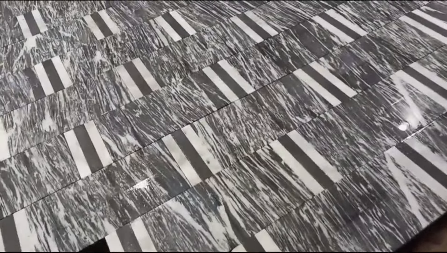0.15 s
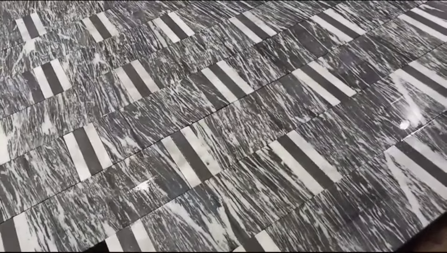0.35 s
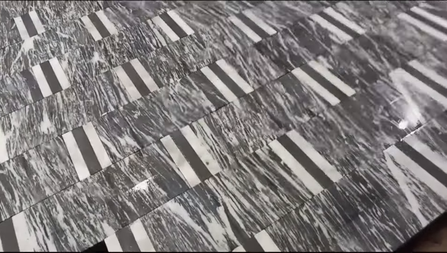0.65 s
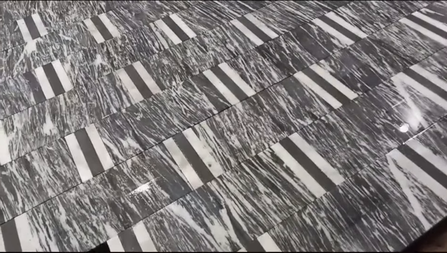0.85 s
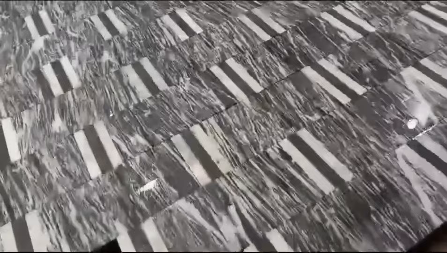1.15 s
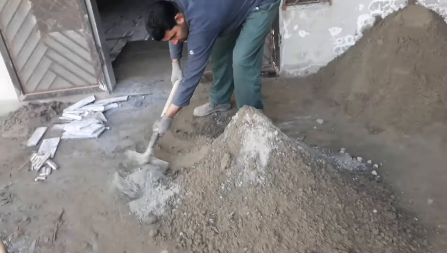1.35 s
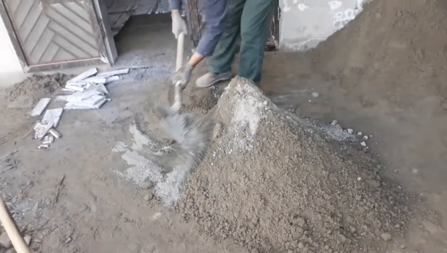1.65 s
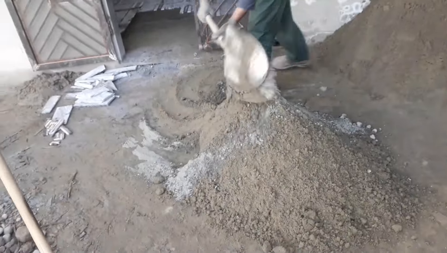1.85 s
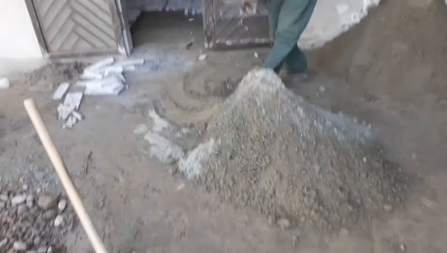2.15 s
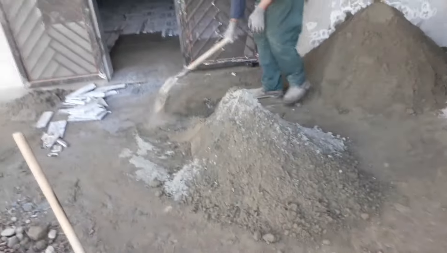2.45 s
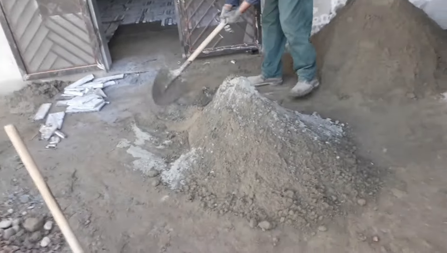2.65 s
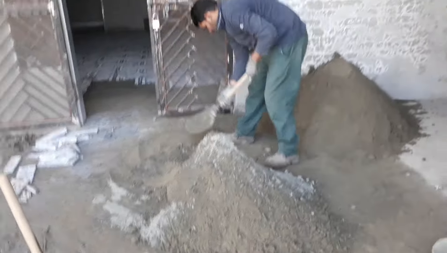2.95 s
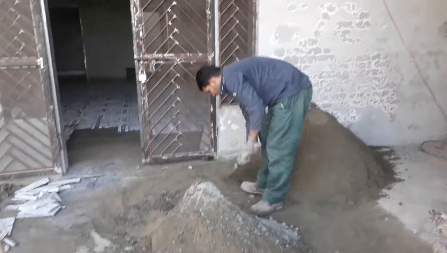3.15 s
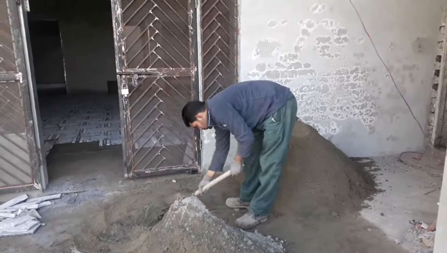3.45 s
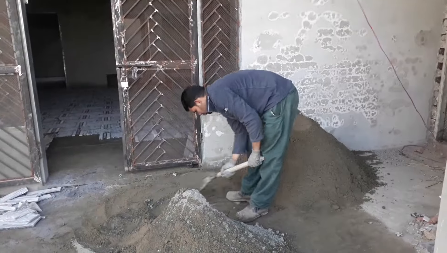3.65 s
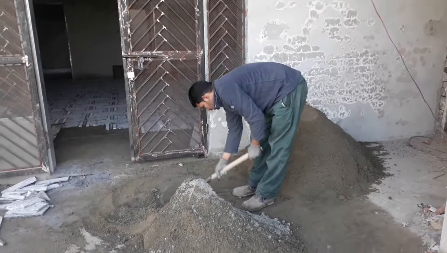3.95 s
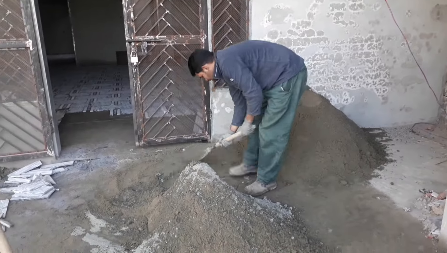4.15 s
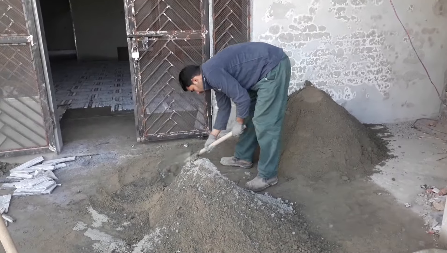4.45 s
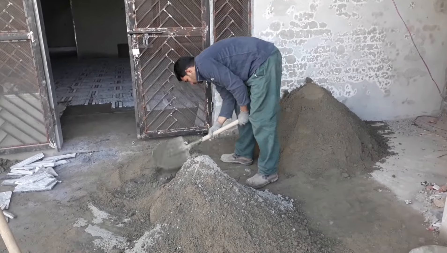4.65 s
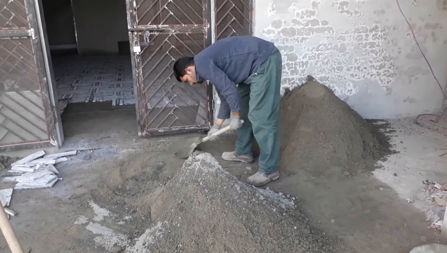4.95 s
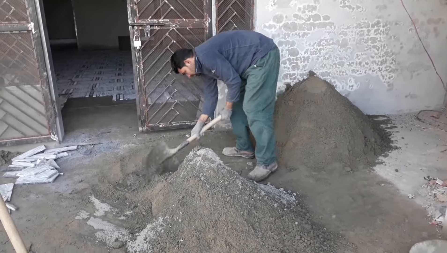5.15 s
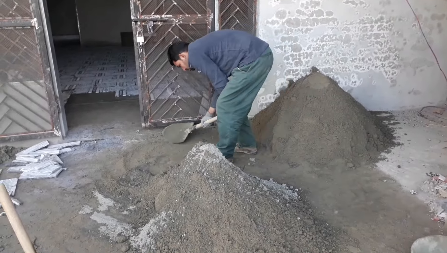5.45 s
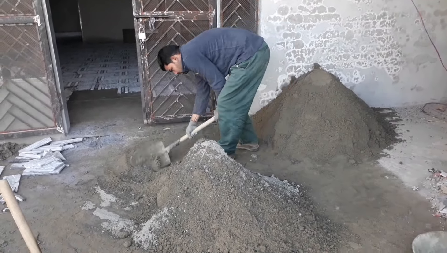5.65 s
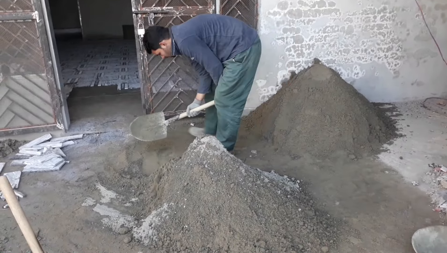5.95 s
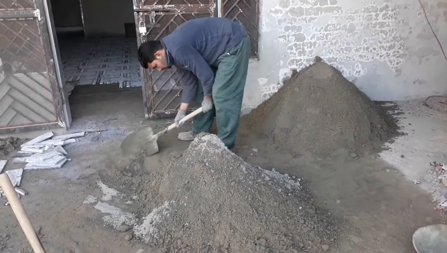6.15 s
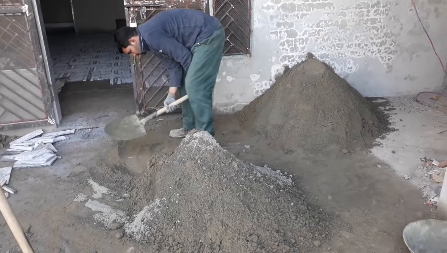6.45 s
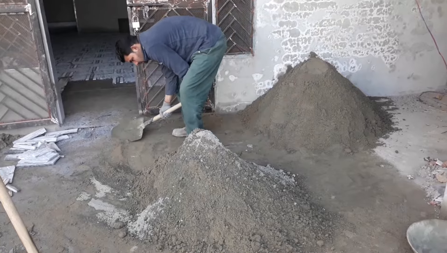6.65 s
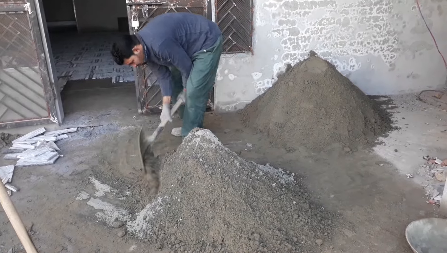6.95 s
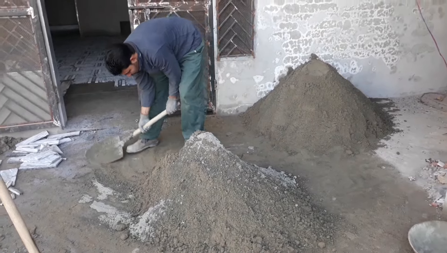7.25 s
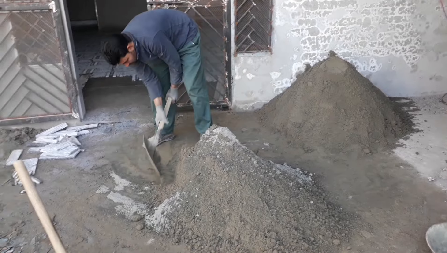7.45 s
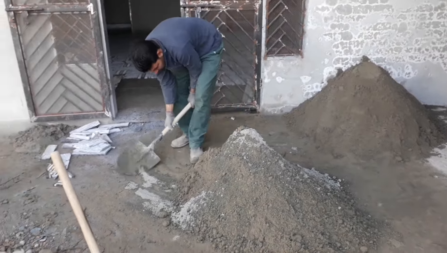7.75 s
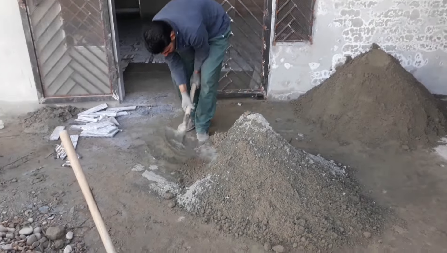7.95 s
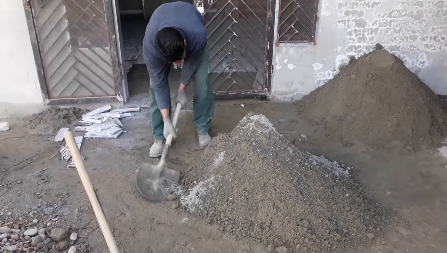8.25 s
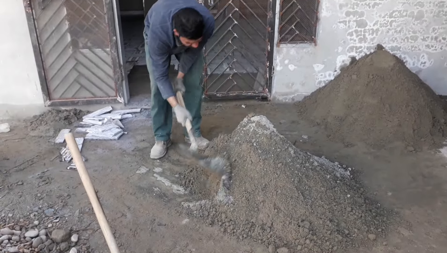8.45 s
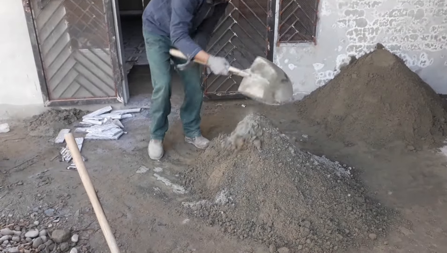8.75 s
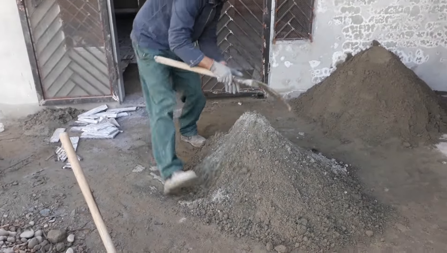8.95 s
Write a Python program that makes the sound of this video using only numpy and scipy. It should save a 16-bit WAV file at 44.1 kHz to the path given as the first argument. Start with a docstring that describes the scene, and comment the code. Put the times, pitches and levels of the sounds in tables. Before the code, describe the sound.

Steel shovel mixing sand and cement on a hard floor between brick walls, heard in mono from a short distance. Quiet room air switches abruptly to faint yard air. A muffled scoop, a loud hollow bang with a weaker follow-up and a thin distant whistle precede steady rasping pushes, with metallic clanks where the edge catches stones. It ends in small rustles and a dull bump.

```python
"""A hushed room indoors, then the scene changes to a concrete yard between brick walls, picked up as one mono
channel. A steel shovel turns sand and cement: one soft stroke, a sharp hollow knock and a duller one, then ten
strokes. Each stroke is a fluttering stream of grain clicks that rings the blade as it lands, grinds and lifts.
Bands of clicks make loose sand hiss and cloth or sand rustle, fading modes ring in the knocks, decaying noise
makes the walls ring on, and a thin far whistle, a gliding sine, sounds once over coloured noise for the air."""
import sys
import numpy as np
from scipy import signal
from scipy.fft import rfft, irfft
from scipy.io import wavfile

SR = 44100
rng = np.random.default_rng(int(sys.argv[2]) if len(sys.argv) > 2 else 0)


def put_to_file(sound):
    """Save the sound as 16-bit audio at rate SR, in the file named by the first command-line argument."""
    columns = np.atleast_2d(sound).T  # one column per channel
    safe = np.clip(columns, -1, 1)
    whole_steps = np.round(safe * 32767)
    wavfile.write(sys.argv[1], SR, whole_steps.astype(np.int16))


N = 400869
TIME = np.arange(N) / SR

# Levels of shovel, knocks, slides, scuffs and ticks stand ahead of this common trim.
WORK_TRIM_DB = -1.5
# Spectra give only a shape: they are scaled to unit power before a level is set.

# Shovel strokes, from landing through skim, swell to the hardest push and slackening to the lift:
# [start_s, skim_s, swell_s, slack_s, hardest_grinding_db, swell_db, load_body_db and sharp_grit_db re grinding
# at the hardest push, landing_thud_db, landing_clash_db]
SHOVEL_STROKES = [ (1.230, 0.0023, .200, 0.037, -33, 5, -4, -9, -66, -42),
                  (3.209, 0.05, 0.15, 0.046, -27, 8, -10, -2.5, -27, -31),
                  (3.74, 0.049, 0.057, 0.12, -25, 4, -10.5, -2, -29.5, -26.5),
                  (4.251, 0.041, 0.16, 0.098, -26, 7, -8.5, -4.5, -33.5, -49),
                  (4.863, 0.015, 0.073, 0.15, -25, 8, -9, -3.5, -62, -32.5),
                  (5.421, 0.0078, 0.23, 0.043, -24.5, 8, -5, -4, -52, -17),
                  (6.058, 0.02, .170, 0.038, -27.5, 6, -2.5, -3.5, -52, -33),
                  (6.602, 0.016, 0.22, 0.033, -26, 9.5, -3.5, -4, -32, -36),
                  (7.224, .047, 0.12, .026, -29, 4, -8, -4.5, -40, -34),
                  (7.696, 0.042, 0.082, 0.029, -24.5, 13, -6, -4, -28, -51),
                  (8.105, 0.049, 0.084, 0.059, -26.5, 6, -8, -4, -44, -34), ]
# Edge catching on a stone in mid-stroke: [start_s, thud_db, clash_db]
STONE_HITS = [(1.355, -29, -30), (1.447, -54, -28), (3.397, -39, -30), (3.845, -41, -24), (3.908, -34, -18),
              (4.452, -50, -23), (4.516, -55, -18.5), (4.883, -38, -22.5), (5.635, -38, -22),
              (6.186, -25.5, -15.5), (7.397, -36, -20.5), (8.124, -58, -40), (8.255, -48, -18)]
# Spectrum of steel on grit: [frequency_hz, level_db per Hz]
GRIT_SPECTRUM = [(53, -46), (90, -28), (282, -16.5), (562, -16.5), (682, -11.5), (1220, -13), (1650, -3.5),
                 (1840, -4.5), (2430, -1.5), (2830, -4), (4540, -7.5), (6980, -9), (8120, -19.5),
                 (12000, -23), (15500, -40)]
# Blade resonances, nominal until the sand shifts and damps them: [pitch_hz, width_hz, lift_db]
BLADE_RESONANCES = [(682, 24, 7), (843, 48, 6), (968, 31, 4), (1307, 23, 4.5), (1674, 9.6, 9.5),
                    (2089, 59, 7.5), (2444, 88, 6), (3006, 67, 4), (3195, 74, 3), (3970, 220, 3),
                    (5860, 110, 5), (7040, 990, 7.5)]
# Spectrum of the dull landing: [frequency_hz, level_db per Hz]
THUD_SPECTRUM = [(60, -33), (130, -5.5), (300, -3), (480, -6), (720, -1), (1100, -9.5), (1700, -39),
                 (4000, -37)]
SKIM_DB = -9.5   # the edge skims the floor before it bites, re the bite
BITE_S = 0.0081   # time it takes to dig in
EASE_DB = -5   # level at the lift, re the hardest push
LIFT_DB_PER_S = -240   # grinding dies as the blade leaves the floor
FILL_DB_PER_S = 20   # the low body grows as sand piles on the blade
DULL_DB_PER_S = -8.5   # and the sharp grit is smothered
FLUTTER_DB, FLUTTERS_PER_S = 0.82, 44.9   # random level flutter, in dB and in draws per second
THUD_FADE_S, CLASH_FADE_S = 0.097, 0.031   # to 60 dB down

# Hollow knocks: [start_s, body_db, crack_db, rise_s, contact_fade_s, share of the full ring time]
HOLLOW_KNOCKS = [(2.3328, -15.5, -14.5, 0.0018, 0.084, 0.81), (2.529, -26, -27, 0.0093, 0.34, 0.72)]
# Hollow modes the knocks ring with: [pitch_hz, level_db re body, full_t60_s]
HOLLOW_MODES = [(108.5, -23, 0.51), (149.4, -6, 0.25), (191, -6.5, 0.17), (221.3, -12.5, 0.49),
                (285.5, -9.5, 0.15), (323, -11, 0.24), (480, -16, 0.094), (567.5, -1, 0.19),
                (596, -3, 0.16), (640, -2.5, 0.2), (757.5, -1.5, 0.084), (922, -26, 0.088),
                (1135, -15, 0.31), (1440, -16, 0.12), (1504, -10, 0.12), (1620, -18, 0.087)]
# Spectrum of the crack of contact: [frequency_hz, level_db per Hz]
CRACK_SPECTRUM = [(50, -21), (130, 2), (400, 2), (600, 7.5), (900, 2), (1150, -4), (1600, 1.5),
                  (1900, -6.5), (2400, 1.5), (3200, -6.5), (4000, -6.5), (4600, -11), (7000, -6.5),
                  (8500, -20), (11500, -24), (15000, -41)]
# Bright flash of the first knock, heard only directly: [pitch_hz, level_db, t60_s]
FLASH_MODES = [(2300, -10, 0.018), (2480, -14, 0.014), (3963, -20, 0.023), (4740, -28, 0.044),
               (7000, -37, .03)]

# Loose sand sliding off the blade or down the pile: [centre_s, half_length_s, level_db]
SAND_SLIDES = [(1.72, 0.26, -55.5), (2.63, 0.069, -45), (2.87, 0.21, -46), (3.02, 0.062, -33.5),
               (8.04, 0.075, -53)]
# Spectrum of the slides: [frequency_hz, level_db per Hz]
SLIDE_SPECTRUM = [(100, -35), (350, -6), (900, -19), (2000, -6.5), (2800, -8), (3550, 1), (4900, -11),
                  (6200, -5), (7150, 1.5), (8600, -20), (11000, -19), (15500, -26)]
# Short bright rustles and scuffs, of cloth or sand: [centre_s, half_length_s, level_db]
RUSTLES_AND_SCUFFS = [(.55, 0.037, -84), (1.136, .008, -66), (2.208, 0.031, -51.5), (6.015, .03, -55),
                      (7.151, 0.073, -54.5), (8.685, 0.048, -49), (9.085, 0.072, -52.5)]
# Spectrum of the rustles and scuffs: [frequency_hz, level_db per Hz]
SCUFF_SPECTRUM = [(500, -26), (3000, -3), (6900, 8), (9000, -4), (12000, -1), (15500, -13)]
# Ticks and squeaks of pebbles: [start_s, level_db, pitch_hz, width_hz, fade_s]
PEBBLE_TICKS = [(2.068, -51, 1650, 700, .07), (2.089, -41.5, 1610, 1000, 0.04),
                (2.241, -37, 840, 503, 0.037), (3.542, -34, 3480, 1400, 0.02),
                (4.125, -43, 6020, 500, 0.18), (8.988, -53.5, 2530, 80, .2)]
TICK_RISE_S = 0.0019

# Soft dull bumps: [start_s, level_db, rise_s, fade_s, centre_hz, width_hz]
DULL_BUMPS = [(.362, -54.5, 0.0027, 0.38, 166, 199), (0.924, -64.5, 0.019, 0.1, 150, 200),
              (1.122, -49, 0.015, 0.05, 83.4, 70), (1.346, -31.5, 0.0095, 0.17, 245, 130),
              (1.423, -35.5, 0.0081, 0.23, 248, 140), (2.95, -45.5, 0.022, 0.27, 262, 120),
              (3.0, -50, 0.021, 0.27, 372, 160), (7.697, -34.5, 0.0032, 0.16, 329, 120),
              (8.986, -48.5, 0.0071, 0.16, 317, 494)]
# Spectrum of a faint tap indoors: [frequency_hz, level_db per Hz]
TAP_SPECTRUM = [(240, -46), (400, -6), (1340, -4), (2050, 0), (6150, -19), (8170, -34), (8900, -20),
                (12000, -47), (15600, -77), (22000, -120)]
TAP_S, TAP_DB, TAP_T60_S = .361, -54, 0.5
# Thin far whistle: [time_s, pitch_hz, level_db]
WHISTLE_GLIDE = [(2.02, 3140, -75), (2.04, 3090, -57), (2.075, 2990, -80), (2.1, 2920, -53),
                 (2.16, 2870, -61), (2.25, 2910, -52.5), (2.32, 2830, -56), (2.35, 2870, -87)]

# Ring time of the walls: [frequency_hz, t60_s]
WALL_RING = [(100, 1.0), (700, 1.25), (1800, 1.22), (2500, 0.5), (4500, 1.07), (8000, 0.55), (14000, 2.5)]
# Tail of the walls re the direct sound, ahead of the wet trim of each source: [frequency_hz, level_db]
WALL_LEVEL = [(100, -7.5), (700, -9), (2000, -5.5), (4500, -14), (8000, -27), (14000, -29)]

# Spectrum of the hushed air indoors: [frequency_hz, level_db per Hz]
HUSH_SPECTRUM = [(18, -43), (30, -6), (108, -1), (272, -4.5), (842, -13), (2470, -13.5), (3430, -15.5),
                 (6250, -26.5), (8030, -35), (12000, -39), (15600, -67), (22000, -120)]
# Level of the hushed air: [time_s, level_db]
HUSH_LEVEL = [(0.0, -69.5), (0.3, -75.5), (0.45, -72), (0.58, -75.5), (1.07, -80.5), (1.19, -91)]
# Spectrum of the open air in the yard: [frequency_hz, level_db per Hz]
YARD_SPECTRUM = [(15, -52), (25, -17), (33, -15), (69, -7), (107, 1), (368, -2), (509, -7), (804, -7),
                 (1410, -8), (1620, -8), (3440, -13.5), (5580, -20), (6920, -13), (9300, -30),
                 (15500, -28.5)]
YARD_FROM_S, YARD_DB = 1.228, -54.5

CUTOFF_HZ = 15700


def shovel():
    """Each stroke opens with the landing of the blade; now and then the edge hits a stone."""
    out, hits = np.zeros(N), np.zeros(N)
    for start_s, *motion, thud_db, clash_db in SHOVEL_STROKES:
        add(out, start_s, walls(stroke(*motion)))   # each stroke is at a new spot, with echoes of its own
        add(hits, start_s, contact(thud_db, clash_db))
    for start_s, thud_db, clash_db in STONE_HITS:
        add(hits, start_s, contact(thud_db, clash_db))
    return out + walls(hits)[:N]


def stroke(skim_s, swell_s, slack_s, db, swell_db, load_db, grit_db,
           sawtooth_db=5.5, judder_db=2.5, patchy_db=1.0, stones_db=-10, pings_db=-5):
    """One push over sand and small stones: a fluttering stream of grain clicks rings the blade."""
    size = SR // 2
    t = TIME[:size]
    level = db + push(t, skim_s, swell_s, slack_s, swell_db)
    since_hardest = t - skim_s - swell_s
    load = load_db + FILL_DB_PER_S * since_hardest
    sharp = grit_db + DULL_DB_PER_S * since_hardest

    sand = grains(size, per_s=7000, spread_db=2.0)
    stones = grains(size, per_s=130, spread_db=0.5)
    flutter = from_db(sawtooth_db * sawtooth_flutter(size) + judder_db * drift(size, 69.0))
    clicks = flutter * (sand + from_db(stones_db) * stones)
    grit = colour(clicks + from_db(pings_db) * pings(size), GRIT_SPECTRUM)

    # the load slides up the blade: its resonances crossfade to new ones every tenth of a second
    ringing = np.zeros(size)
    for moment in np.arange(size // (SR // 10) + 1) / 10:
        crossfade = np.maximum(1 - 10 * abs(t - moment), 0)
        ringing += blade(grit * crossfade)

    # body of the load, grinding edge and sharp grit, each with a level of its own
    below_1300, below_4750 = [
        signal.sosfiltfilt(signal.butter(4, hz, fs=SR, output="sos"), ringing) for hz in (1300, 4750)]
    parts = [(below_1300, load), (below_4750 - below_1300, 0), (ringing - below_4750, sharp)]
    out = np.zeros(size)
    for part, part_db in parts:
        out += rms_one(part) * from_db(level + part_db + patchy_db * drift(size, 60.4))
    return out * np.minimum(t / 0.0044, 1)


def push(t, skim_s, swell_s, slack_s, swell_db):
    """Effort of one stroke in dB re its hardest: skim, bite, swell, slacken, lift, with a small random flutter."""
    bites, hardest, lifts = np.cumsum([skim_s, swell_s, slack_s])
    moments = [bites, bites + BITE_S, hardest, lifts]
    effort = np.interp(t, moments, [SKIM_DB - swell_db, -swell_db, 0, EASE_DB])
    lift = LIFT_DB_PER_S * np.maximum(t - lifts, 0)
    return effort + lift + FLUTTER_DB * drift(len(t), FLUTTERS_PER_S)


def sawtooth_flutter(size, per_s=42, uneven_db=4.0):
    """The level flutters in an uneven sawtooth, about 42 jumps a second, sinking after each jump."""
    pace = per_s * from_db(uneven_db * drift(size, 30))
    cycles = rng.random() + np.cumsum(pace) / SR
    return .5 - cycles % 1


def pings(size, per_s=420, t60=0.055, low_hz=600, high_hz=9000, spread_db=3.0):
    """Each small stone rings the plate briefly at a pitch of its own."""
    out, t = np.zeros(size + SR // 10), TIME[:SR // 10]
    shape = burst(0.0027, t60, size=len(t))
    for when, pitch, chance in rng.random((int(per_s * size / SR), 3)):
        hz = low_hz + pitch * (high_hz - low_hz)
        height = from_db(spread_db * min(-np.log(chance), 3))
        add(out, when * size / SR, height * shape * np.sin(2 * np.pi * hz * t))
    return rms_one(out[:size])


def blade(x, detune=0.0031, vary_db=-1.5):
    """The blade lifts its resonances; the sand lying on it shifts and damps them a little."""
    out = x
    chances = rng.uniform(-0.67, 1, (len(BLADE_RESONANCES), 2))
    for (hz, width, lift_db), (shift, damp) in zip(BLADE_RESONANCES, chances):
        centre = hz * (1 + detune * shift)
        resonance = signal.lfilter(*signal.iirpeak(centre, centre / width, fs=SR), x)
        out = out + (from_db(lift_db + vary_db * damp) - 1) * resonance
    return out


def contact(thud_db, clash_db, landing_s=0.0056):
    """Steel meets floor or stone: a dull thud and a shorter bright clash, both through the blade."""
    size = SR // 4
    out = np.zeros(size)
    parts = [(THUD_SPECTRUM, thud_db, THUD_FADE_S), (GRIT_SPECTRUM, clash_db, CLASH_FADE_S)]
    for spectrum, db, fade in parts:
        steel = rms_one(blade(colour(rng.standard_normal(size), spectrum)))
        out += from_db(db) * burst(landing_s, fade, size=size) * steel
    return out


def knocks(rebound_s=.0125, rebound_db=-6, rattle=1.0, rattle_per_s=120, settle_s=0.019):
    """A crack of contact, a quick rebound, and hollow modes that rattle as they die."""
    out, t = np.zeros(N), TIME[:SR]
    for start_s, body_db, crack_db, rise, fade, ring in HOLLOW_KNOCKS:
        for hz, db, t60 in HOLLOW_MODES:
            rattling = 1 + rattle * np.minimum(t / settle_s, 1) * drift(SR, rattle_per_s)
            mode = np.sin(2 * np.pi * (hz * t + rng.random())) * rattling
            build_up = rise + 2 / hz   # low modes take longer to get going
            add(out, start_s, from_db(body_db + db) * mode * burst(build_up, ring * t60, size=SR))
        crack = from_db(crack_db) * burst(rise, fade)
        for delay, db in ((0, 0), (rebound_s, rebound_db)):
            clicks = crack * grains(len(crack), per_s=9800, spread_db=2.5)
            add(out, start_s + delay, from_db(db) * colour(clicks, CRACK_SPECTRUM))
    return out


def flash(rise_s=0.0036):
    """Stiff high modes of the first knock that die almost at once."""
    out, t = np.zeros(N), TIME[:SR // 2]
    for hz, db, t60 in FLASH_MODES:
        mode = np.sin(2 * np.pi * (hz * t + rng.random()))
        add(out, HOLLOW_KNOCKS[0][0], from_db(db) * burst(rise_s, t60) * mode)
    return out


def swishes(rows, spectrum, grain_db, per_s):
    """Slides, rustles and scuffs: patches of coloured clicks swell and fade, with a flickering level."""
    out, t = np.zeros(N), np.arange(-.5, .5, 1 / SR)
    for centre_s, half, db in rows:
        clicks = colour(grains(len(t), per_s=per_s, spread_db=1.5), spectrum)
        flicker = from_db(db + grain_db * drift(len(t), 120.6))
        add(out, centre_s - .5, np.exp(-(t / half) ** 2) * flicker * clicks)
    return out


def ticks():
    """A pebble clicks or squeaks in a narrow band around its own pitch."""
    out = np.zeros(N)
    for start_s, db, hz, width, fade in PEBBLE_TICKS:
        shape = burst(TICK_RISE_S, fade)
        add(out, start_s, from_db(db) * shape * around(rng.standard_normal(SR), hz, width)[-len(shape):])
    return out


def bumps():
    """Dull low bumps in bands of noise, and the faint tap indoors in coloured noise."""
    out = np.zeros(N)
    for start_s, db, rise, fade, hz, width in DULL_BUMPS:
        shape = burst(rise, fade)
        add(out, start_s, from_db(db) * shape * around(rng.standard_normal(SR), hz, width)[-len(shape):])
    tap = from_db(TAP_DB) * burst(0.0039, TAP_T60_S)
    add(out, TAP_S, colour(tap * rng.standard_normal(len(tap)), TAP_SPECTRUM))
    return out


def whistle():
    """One thin tone far off that sags and then wavers: a sine with gliding pitch and level."""
    time_s, hz, db = np.transpose(WHISTLE_GLIDE)
    level = from_db(np.interp(TIME, time_s, db, left=-200, right=-200))
    return level * np.sin(2 * np.pi * np.cumsum(np.interp(TIME, time_s, hz)) / SR)


def walls(x, wet_db=-2.0, early_db=-9, early_t60=0.19, first_s=.006):
    """Direct sound, close reflections off ground and door, then a tail with a ring time for each band."""
    t, edges = TIME[:SR], np.geomspace(60, 16000, 11)
    white, tail = rng.standard_normal((2, len(t))), 0
    for k, (low, high) in enumerate(zip(edges, edges[1:])):
        hz = np.sqrt(low * high)
        decay = np.exp(-np.log(1000) * t / at_hz(WALL_RING, hz))
        fade = decay * np.clip((t - first_s) / 0.019, 0, 1)
        tail = tail + from_db(at_hz(WALL_LEVEL, hz)) * band(white[k % 2], low, high) * rms_one(fade)
    early = grains(len(t), per_s=1500, spread_db=3.5) * from_db(-60 * t / early_t60) * (t > first_s)
    response = from_db(wet_db) * (tail + from_db(early_db) * rms_one(early)) / np.sqrt(len(t))
    response[0] = 1   # the direct sound
    return signal.fftconvolve(x, response)


def background(waver_db=3.4):
    """Hushed air indoors, then the wavering air of the yard, both as coloured noise."""
    outside = np.clip((TIME - YARD_FROM_S) / 0.0046, 0, 1)
    hush_level = from_db(np.interp(TIME, *np.transpose(HUSH_LEVEL)))
    hush = hush_level * colour(rng.standard_normal(N), HUSH_SPECTRUM)
    yard_level = from_db(YARD_DB + waver_db * drift(N, 24))
    yard = yard_level * colour(rng.standard_normal(N), YARD_SPECTRUM)
    return (1 - outside) * hush + outside * yard


def grains(size, per_s, spread_db):
    """Random clicks of uneven size, rms 1, such as sand grains cracking under steel."""
    heights = from_db(spread_db * np.minimum(rng.exponential(1, size), 4))
    return rms_one(heights * rng.choice([-1, 1], size) * (rng.random(size) < per_s / SR))


def burst(rise, t60, size=SR // 2):
    """Envelope of a blow: a straight rise, then an exponential fade."""
    t = TIME[:size]
    return np.minimum(t / rise, 1) * from_db(-60 * np.maximum(t - rise, 0) / t60)


def drift(size, rate):
    """Random wander about zero: normal draws, rate of them a second, joined by straight lines."""
    steps = np.arange(size) * rate / SR
    count = int(steps[-1]) + 2
    return np.interp(steps, np.arange(count), rng.standard_normal(count))


def colour(x, spectrum, size=4096):
    """Causal (minimum-phase) filter of unit power with the given spectrum."""
    hz = np.maximum(np.arange(size // 2 + 1) * SR / size, 1)
    cepstrum = irfft(np.log(from_db(at_hz(spectrum, hz))))
    cepstrum[1:size // 2] *= 2   # folding the cepstrum forward makes the filter causal
    cepstrum[size // 2 + 1:] = 0
    response = irfft(np.exp(rfft(cepstrum)))
    return signal.fftconvolve(x, response / np.sqrt(np.sum(response ** 2)))[:len(x)]


def band(x, low, high):
    """Butterworth band-pass."""
    edges = [max(low, 10), min(high, .45 * SR)]
    return signal.sosfilt(signal.butter(2, edges, "band", fs=SR, output="sos"), x)


def around(x, hz, width):
    """One band of x, rms 1, whose edges have hz as their geometric mean."""
    low = np.sqrt(hz ** 2 + width ** 2 / 4) - width / 2
    return rms_one(band(x, low, low + width))


def at_hz(points, hz):
    """Reads a table on a log-frequency axis."""
    table_hz, values = np.transpose(points)
    return np.interp(np.log(hz), np.log(table_hz), values)


def from_db(db):
    """Amplitude of a level in dB."""
    return 10 ** (np.asarray(db) / 20)


def rms_one(x):
    """Scales x to an rms of 1."""
    return x / np.sqrt(np.mean(x ** 2) + 1e-20)


def add(out, s, x):
    """Mixes x in from time s."""
    start = max(round(s * SR), 0)
    out[start:start + len(x)] += x[:max(N - start, 0)]


def scene():
    """The work and its reverberation, with bumps and whistle, over the background."""
    slides = swishes(SAND_SLIDES, SLIDE_SPECTRUM, grain_db=3.0, per_s=7800)
    scuffs = swishes(RUSTLES_AND_SCUFFS, SCUFF_SPECTRUM, grain_db=6.0, per_s=7600)
    loose = walls(slides + scuffs + ticks(), wet_db=-5.5)[:N]
    hollow = walls(knocks(), wet_db=-1.5, early_db=-9)[:N] + flash()
    work = shovel() + hollow + loose
    return (from_db(WORK_TRIM_DB) * work + bumps() + whistle() + background())[None]


def record(dry):
    """The microphone channel: an elliptic low-pass cuts the top steeply."""
    return signal.sosfilt(signal.ellip(10, .2, 70, CUTOFF_HZ, fs=SR, output="sos"), dry)


dry = scene()
out = record(dry)
put_to_file(out)
```